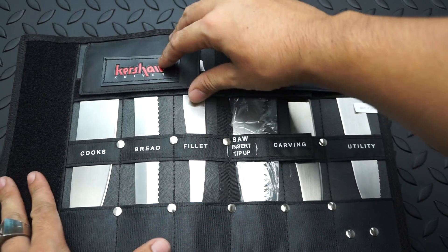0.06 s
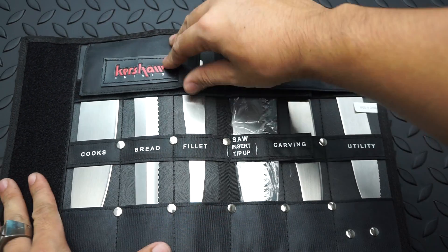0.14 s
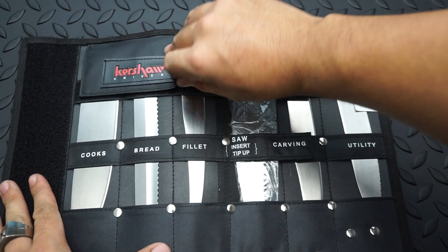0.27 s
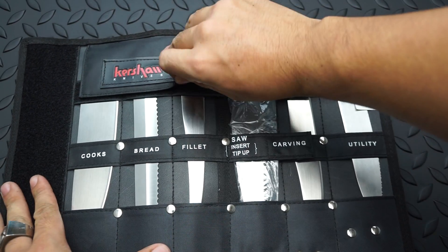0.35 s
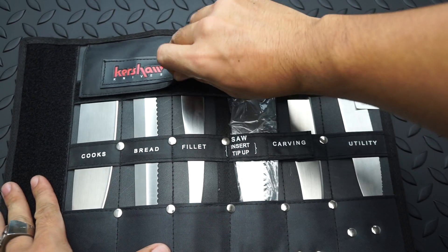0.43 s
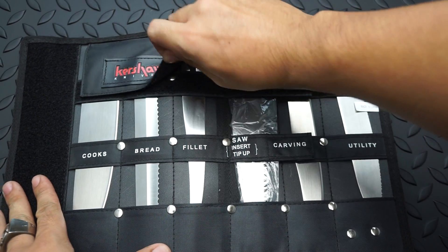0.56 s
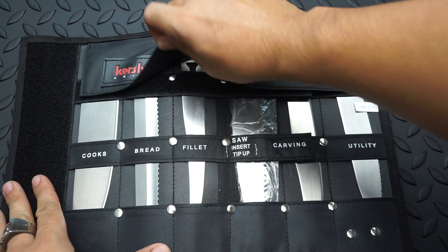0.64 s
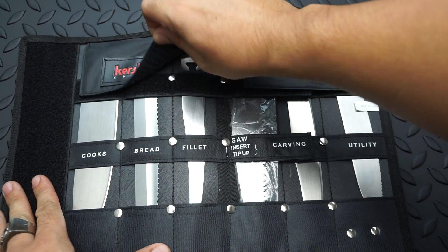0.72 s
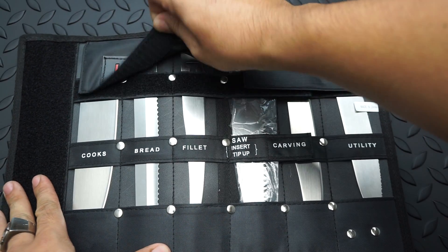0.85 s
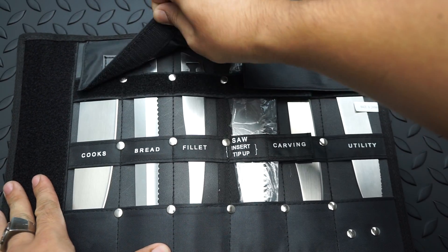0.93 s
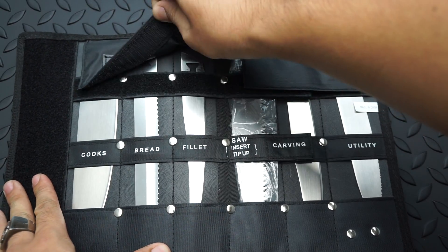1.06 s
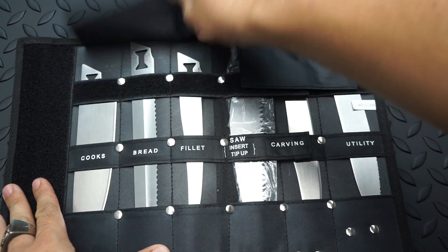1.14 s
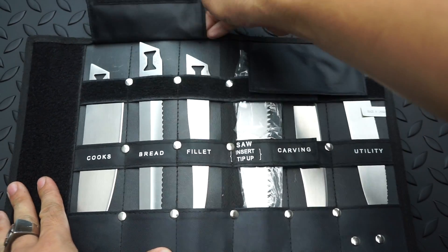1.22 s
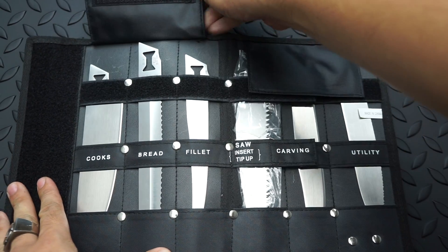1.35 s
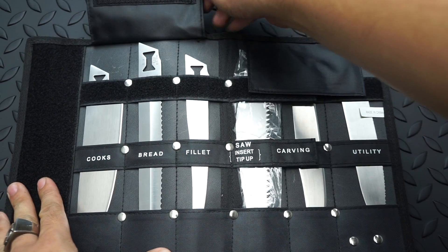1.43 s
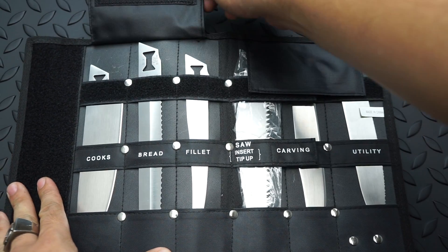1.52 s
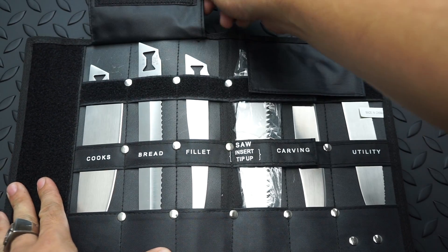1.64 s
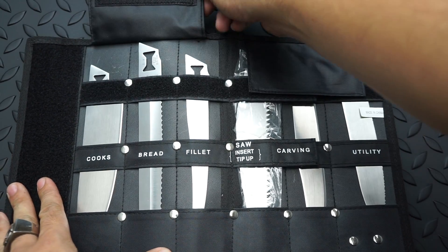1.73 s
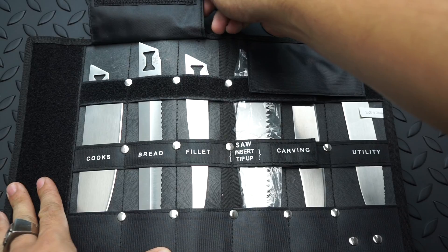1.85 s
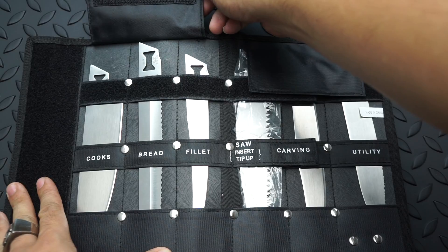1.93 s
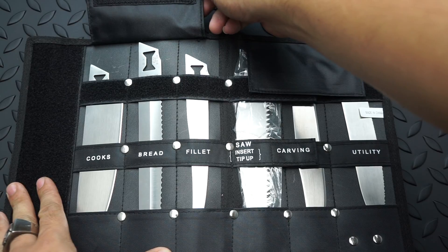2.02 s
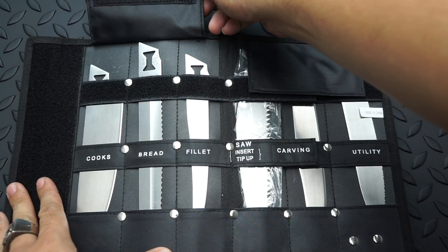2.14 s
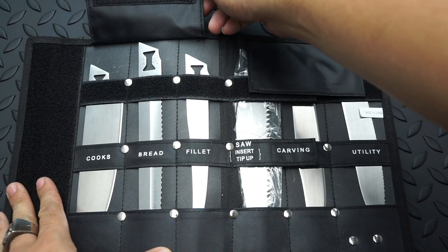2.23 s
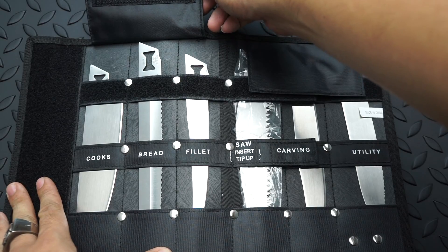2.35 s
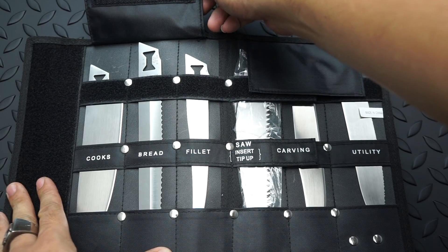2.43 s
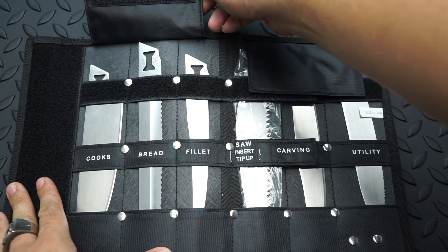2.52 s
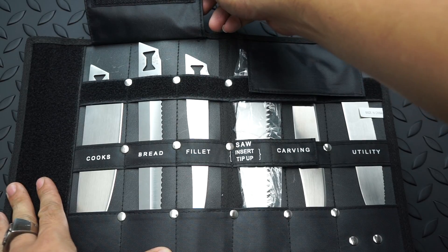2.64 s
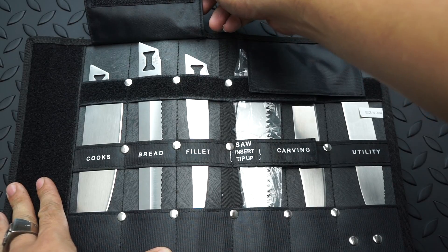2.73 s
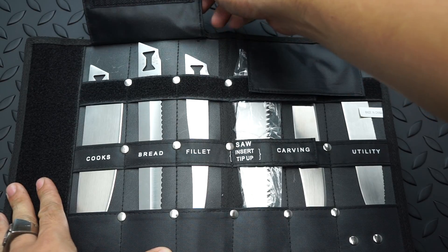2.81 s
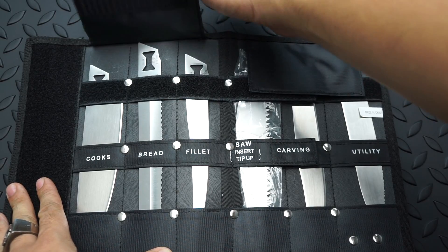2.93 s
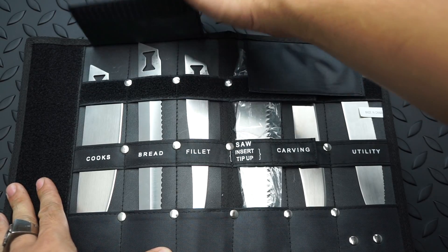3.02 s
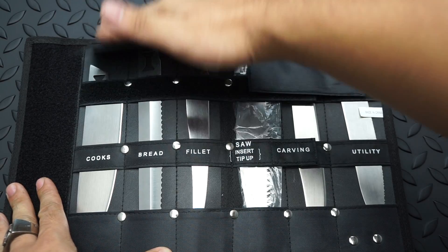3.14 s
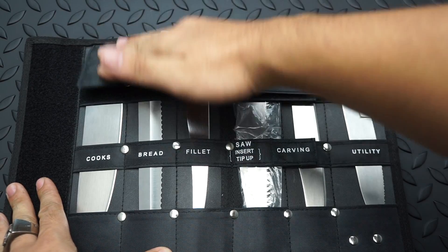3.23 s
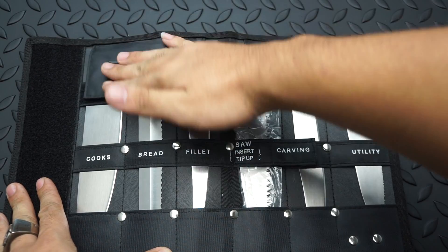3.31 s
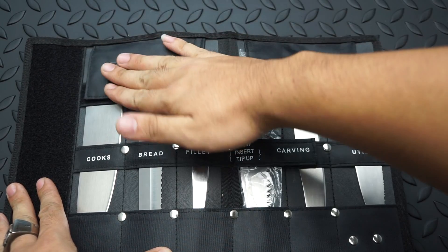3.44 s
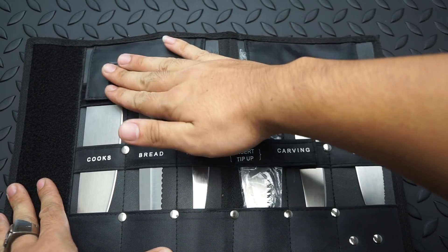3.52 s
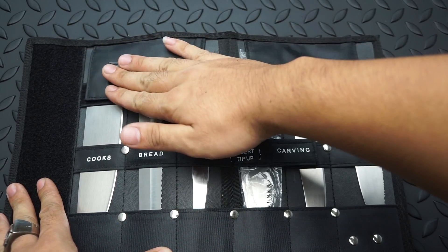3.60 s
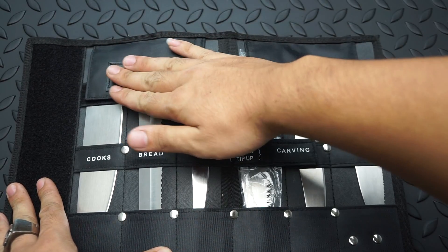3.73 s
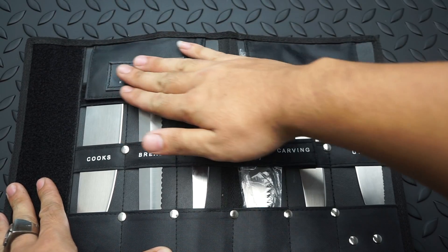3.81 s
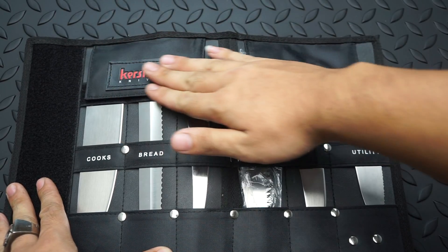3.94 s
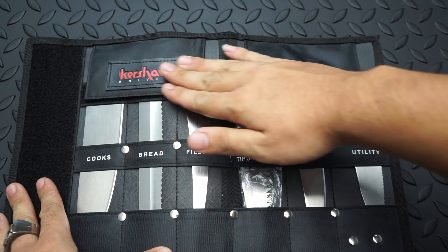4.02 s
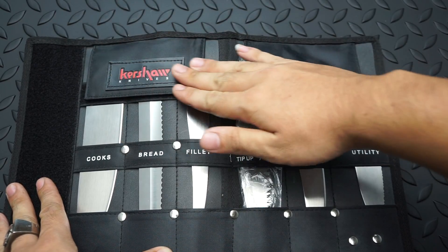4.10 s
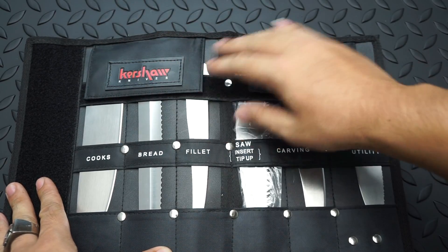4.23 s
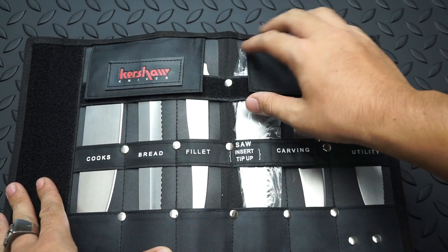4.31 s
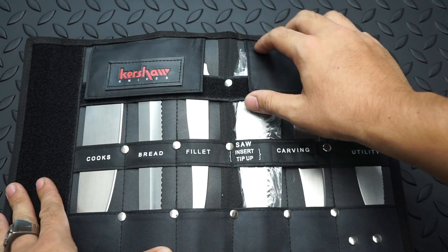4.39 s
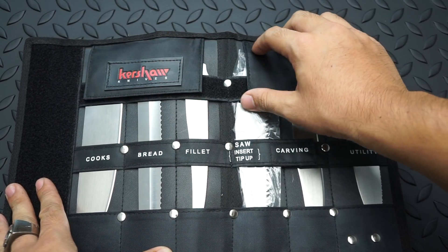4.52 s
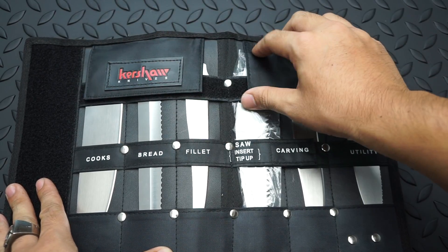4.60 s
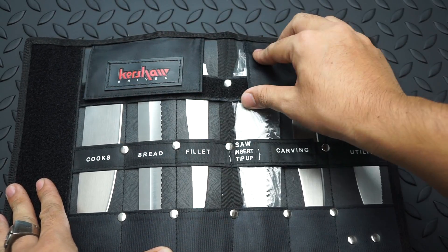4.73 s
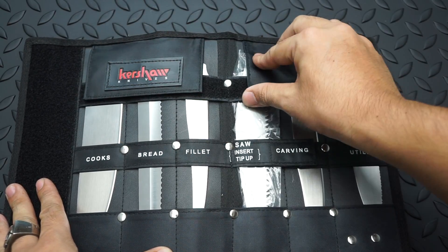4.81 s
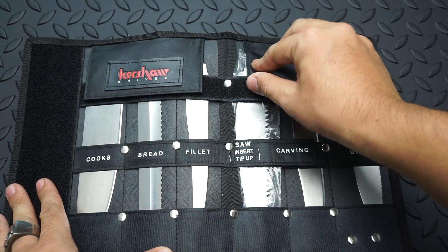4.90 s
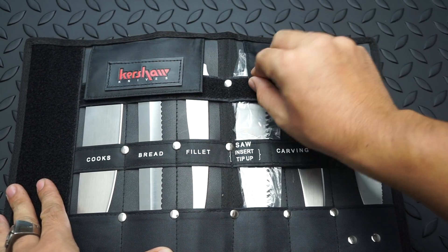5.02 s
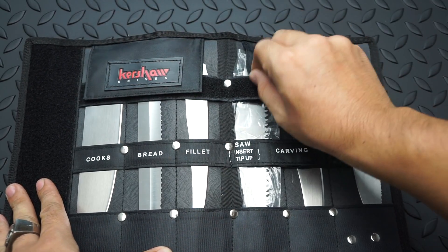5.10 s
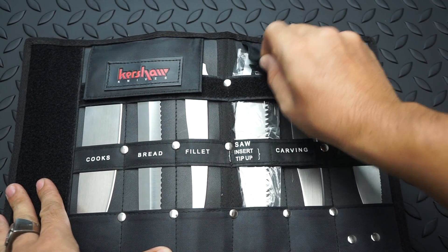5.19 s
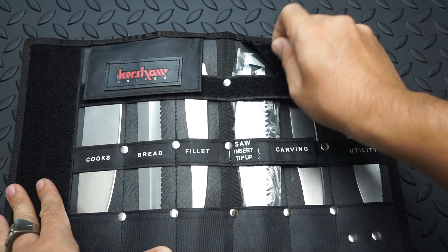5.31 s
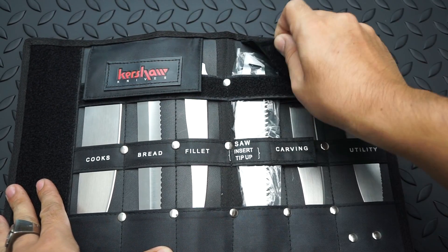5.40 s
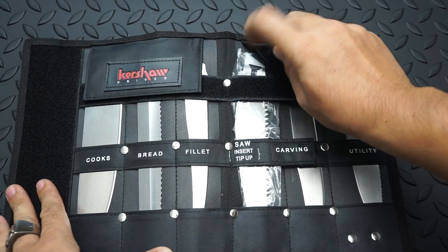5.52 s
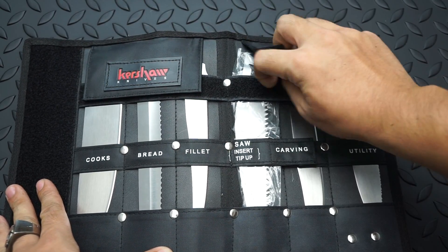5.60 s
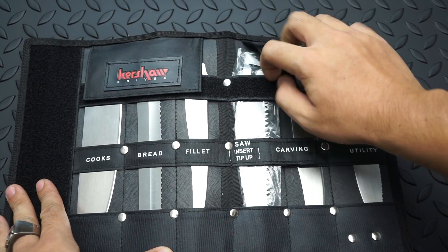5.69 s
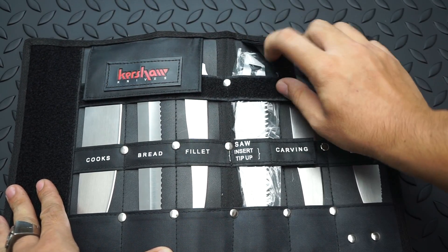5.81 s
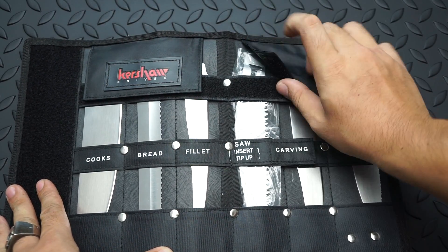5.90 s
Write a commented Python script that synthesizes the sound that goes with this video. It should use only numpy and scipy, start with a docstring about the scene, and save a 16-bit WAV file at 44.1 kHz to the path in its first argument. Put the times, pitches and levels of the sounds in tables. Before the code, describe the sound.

Close hook-and-loop flap tears open in jerky bright rasps, then dull bumps, soft cloth rubbing, and a second shorter sharp tear.

```python
"""A hand peels two hook-and-loop flaps of a nylon case open, close to a stereo microphone in a small hard room.
First the hand slides briefly over the cloth and the first flap tears: jerks and steady pulls snap hooks loose
and drum on the flap. A low push of the case follows, then dull bumps from further away and more sliding.
Single hooks tick before the second flap tears over another low push; short strokes, a tick and a faint jerk
end it. Shaped clicks make the hand, seam and bumps, rung modes the push, and quiet room noise lies below."""
import sys
import numpy as np
from scipy import signal
from scipy.io import wavfile
from scipy.ndimage import uniform_filter1d

SR = 44100
rng = np.random.default_rng(int(sys.argv[2]) if len(sys.argv) > 2 else 0)


def log_audio(samples):
    """Write samples as a 16-bit WAV file to the path given in sys.argv[1]."""
    # one column per channel
    frames = np.atleast_2d(samples).T
    # limit to full scale, then quantise
    limited = np.clip(frames, -1, 1)
    pcm = np.round(limited * 32767).astype(np.int16)
    wavfile.write(sys.argv[1], SR, pcm)


N = 262395  # length in samples


def amp(db):
    """Gain factor of a level in dB."""
    return 10 ** (np.asarray(db) / 20)


def evened(x):
    """Scale a sound to rms 1."""
    return x / np.sqrt(np.mean(x ** 2) + 1e-20)


def read(points, hz):
    """Read a table of (Hz, value) between its points, along log frequency."""
    point_hz, value = np.transpose(points)
    return np.interp(np.log(hz + 1), np.log(point_hz + 1), value)


def add(mix, start_s, sound):
    """Lay a sound into the mix from its start, cut off at the end of the mix."""
    part = mix[..., round(start_s * SR):][..., :np.shape(sound)[-1]]
    part += sound[..., :part.shape[-1]]


def colour(x, points):
    """Causal minimum-phase filter that leaves white noise at its level."""
    hz = abs(np.fft.fftfreq(4096, 1 / SR))
    log_gain = np.log(amp(np.maximum(read(points, hz), -100)))
    spectrum = np.exp(np.conj(signal.hilbert(log_gain)))
    taps = np.fft.ifft(spectrum).real[:2048]
    return signal.oaconvolve(x, taps / np.linalg.norm(taps))[:len(x)]


def grit(per_s, spread_db):
    """Separate clicks of uneven size and random sign, at random moments, rms 1."""
    size = amp(spread_db * np.minimum(rng.exponential(1, N), 4))
    size *= rng.choice([-1., 1.], N)
    return evened(size * (rng.random(N) < per_s / SR))


def swells(rows, axis, rise, fall):
    """Gain of events that rise, hold and fall smoothly; rise and fall are shares of each length."""
    out = np.zeros(N)
    for row in rows:
        start_s, length_s = row[:2]
        u = np.linspace(0, 1, max(round(length_s * SR), 2))
        shape = np.clip(np.minimum(u / rise, (1 - u) / fall), 0, 1)
        add(out, start_s, amp(row[axis]) * np.sin(shape * np.pi / 2) ** 2)
    return out


# Likeness of left and right in diffuse sound at the microphone.
# Each row: frequency in Hz, likeness from 0 to 1.
LIKENESS = [(30, 0.99), (290, 0.88), (640, 0.73), (1400, 0.58), (3000, .1)]


def diffuse(count, size, gain):
    """Two-channel noise from all around, most alike in the bass; gain(hz, t) shapes it."""
    hz = np.fft.rfftfreq(size, 1 / SR)[:, None]
    t = np.arange(4 * count // size + 5) * size / 4 / SR
    a, b, c, d = rng.standard_normal((len(t), len(hz), 4)).T
    same = np.clip(read(LIKENESS, hz), -1, 1)
    left = a + 1j * b
    right = same * left + np.sqrt(1 - same ** 2) * (c + 1j * d)
    spectra = np.array([left, right]) * gain(hz, t)
    return signal.istft(spectra, nperseg=size, noverlap=3 * size // 4)[1][:, :count]


# Spectrum of the room noise. Each row: frequency in Hz, relative density in dB.
AIR_COLOUR = [(15, -11), (28, 3), (55, -18), (100, -2), (146, -2), (347, -1.5), (472, -10), (1000, -12.5),
              (2080, -20), (13200, -29), (16000, -31)]
AIR_DB = -62  # rms before the wavering


def air():
    """Room noise as diffuse sound of uneven colour, its level wavering slowly."""
    noise = diffuse(count=N, size=2048, gain=lambda hz, t: amp(read(AIR_COLOUR, hz)))
    drift = uniform_filter1d(uniform_filter1d(rng.standard_normal(N), size=6000), size=6000)
    return amp(AIR_DB) * evened(noise) * amp(1.5 * evened(drift))  # wavers by 1.5 dB rms


# Strokes of hand and cloth, close to the microphone.
# Each row: start in seconds, length in seconds, relative level of the hiss in dB, of the body in dB.
STROKES = [(0, 0.23, -57.5, -48), (2.9, 1.47, -64.5, -66.5), (3.3, 0.8, -79, -62.5),
           (3.7, 0.97, -56.5, -55.5), (4.4, 0.43, -58.5, -57), (4.7, 0.66, -54, -54.5),
           (5.57, 0.11, -48, -52), (5.64, 0.1, -41.5, -46.5), (5.77, 0.11, -41, -45.5),
           (5.85, 0.078, -45, -49.5)]
# Colour of the hiss of the weave. Each row: frequency in Hz, gain in dB.
WEAVE_COLOUR = [(1500, -7), (2050, -7.5), (2500, -1.5), (3300, -6), (5400, -8), (10000, -11),
                (13000, -13.5), (16000, -22)]
# Dull colour of soft contact, shared by the rustle and the far bumps. Each row: frequency in Hz, gain in dB.
DULL_COLOUR = [(80, -28.5), (160, -5.5), (260, -18), (410, -2), (520, -8), (650, -5), (760, -9.5),
               (1000, -2.5), (1800, -10.5), (5000, -16)]


def slide():
    """Skin on woven nylon: dense fine clicks make a hiss, sparser dull ones a soft rustle."""
    # a stroke swells and fades without a hold
    hiss_gain, body_gain = (swells(STROKES, axis=k, rise=0.29, fall=0.71) for k in (2, 3))
    hiss = colour(grit(per_s=22000.0, spread_db=3.5) * hiss_gain, WEAVE_COLOUR)
    rustle_colour = DULL_COLOUR[:-2] + [(1800, -18)]  # duller on top than the bumps
    rustle = colour(grit(per_s=3300.0, spread_db=4.5) * body_gain, rustle_colour)
    return hiss + rustle


# Jerks of the seam, close to the microphone. Each row: start in seconds, relative level of the snaps in dB,
# of the drumming of the flap in dB, decay time in ms.
JERKS = [(0.082, -48, -42, 6.8), (0.1013, -35, -33, 2.5), (0.1227, -26.5, -58, 3), (0.137, -28.5, -47, 2.5),
         (0.1857, -19, -31, 5.6), (0.219, -16, -25, 8.8), (0.271, -13, -24.5, 6.4),
         (0.349, -19, -32.5, 6.3), (0.3687, -8, -18, 4.9), (0.408, -7, -18.5, 3.9),
         (0.4913, -13, -17.5, 7.6), (0.5095, -12, -23, 11), (0.5658, -4.5, -11, 2.3),
         (0.5825, -10.5, -37, 2.5), (0.6194, -12.5, -17.5, 6.5), (0.6266, -3.5, -18, 1.5),
         (0.702, -16, -8, 0.79), (0.7559, -12.5, -28, 4.4), (0.7673, -8.5, -17, 6.9),
         (0.8035, -13.5, -25, 5), (0.864, -10, -26.5, 7.5), (0.905, -13, -18, 2), (0.927, -12, -20.5, 6.6),
         (1.045, -9.5, -19, 1.3), (1.113, -18, -23, 11.5), (1.1376, -11.5, -18, 2.2),
         (1.1438, -5.5, -12, 2.7), (4.486, -39.5, -47, 3.5), (4.5287, -35.5, -55, 1.6),
         (4.9051, -26.5, -37, 2.1), (4.9122, -25, -36, 2.1), (5.006, -25.5, -36.5, 3.1),
         (5.0843, -29.5, -41, 3.4), (5.0955, -26.5, -36, 4.8), (5.1129, -2, -15, 0.6),
         (5.1172, -8.5, -23, 2.8), (5.13, -21, -37, 0.85), (5.1545, -2, -21, 2.2), (5.173, -15, -24, 4.1),
         (5.222, -10, -19, 1.7), (5.256, -14, -18, 2.6), (5.284, -7, -33, 0.91), (5.3109, -3, -11, 1.4),
         (5.327, -11.5, -14.5, 1.6), (5.347, -9, -18.5, 4.4), (5.3986, -24, -21, 4.8),
         (5.407, -6, -11, 0.89), (5.4106, -9.5, -10.5, 2.4), (5.814, -34, -53, 1.2)]
# Steady pulls that peel the seam between the jerks. Each row: start in seconds, length in seconds,
# relative level of the snaps in dB, of the drumming of the flap in dB.
PULLS = [(.41, 0.033, -19, -24), (.5, 0.075, -15.5, -18), (.625, 0.089, -16.5, -20), (.77, 0.091, -19, -27),
         (.87, 0.09, -19.5, -23.5), (1.142, 0.026, -16.5, -16), (5.12, 0.1, -19, -28),
         (5.195, 0.12, -19, -23)]
# Colours of the snaps, first and second tear. Each row: frequency in Hz, gain in dB.
SNAP_FIRST = [(300, -65.5), (1200, -33), (1750, -10.5), (2400, -4), (3200, -2.5), (5000, -1.07), (8000, -4),
              (11500, -7), (16000, -15)]
SNAP_SECOND = [(300, -67), (1200, -39.5), (1800, -10), (2400, -0.2), (3100, -2), (3800, -4.5), (4600, -2),
               (8000, -3.5), (11500, -6.5), (16000, -10.5)]
# Colours of the drumming flap, loose and then held taut. Each row: frequency in Hz, gain in dB.
FLAP_LOOSE = [(120, -41.5), (240, -25.5), (300, -16), (500, -9.5), (640, -2.5), (760, -5), (870, 2.5),
              (960, -5), (1250, -6), (1650, -14.5), (2500, -35)]
FLAP_TAUT = [(120, -33.5), (260, -19), (430, -4), (560, -4.5), (650, -4), (800, -5), (970, -1.5),
             (1230, -0.5), (1700, -8.5), (2600, -13), (4000, -37)]


def seam():
    """Hooks snap loose in large jerks and in many small ones; the same tugs drum on the flap."""
    hooks, knocks = grit(per_s=7000., spread_db=2.5), grit(per_s=2500., spread_db=0.0)
    t_ms = np.arange(1500) / SR * 1000
    clumps = abs(grit(per_s=400., spread_db=1.0))
    clumps = 0.4 + signal.oaconvolve(clumps, np.exp(-t_ms / 0.33))[:N]
    # a steady pull frees hooks at a steady pace
    clumps /= np.sqrt(uniform_filter1d(clumps ** 2, size=800))
    snap_gain, flap_gain = (swells(PULLS, axis=k, rise=0.039, fall=0.5) for k in (2, 3))
    snaps = hooks * clumps * snap_gain
    tugs = knocks * np.sqrt(clumps) * flap_gain
    for start_s, snap_db, flap_db, decay_ms in JERKS:
        burst, at = np.exp(-t_ms / max(decay_ms, .3)), round(start_s * SR)
        crack, knock = (burst * clicks[at:at + len(burst)] for clicks in (hooks, knocks))
        # the first hooks of a short jerk let go together
        crack[0] = np.linalg.norm(crack) / (1 + decay_ms / 4.3)
        strength = np.linalg.norm(burst)
        add(snaps, start_s, crack * amp(snap_db) * strength / np.linalg.norm(crack))
        add(tugs, start_s, knock * amp(flap_db) * strength / np.linalg.norm(knock))
    t = np.arange(N) / SR
    second = t > 5.1  # the second tear has its own colour
    taut = t > 1.13  # from the last jerks of the first tear on, the cloth is held taut
    drums = colour(tugs * ~taut, FLAP_LOOSE) + colour(tugs * taut, FLAP_TAUT)
    return colour(snaps * ~second, SNAP_FIRST) + colour(snaps * second, SNAP_SECOND) + drums


# Low push of the case on the table.
# Each row: start in seconds, length in seconds, level of the lower mode in dB, of the upper mode in dB.
PUSHES = [(1.2, 0.35, -68, -58), (5.05, 0.48, -53, -50.5), (5.4, 0.54, -71, -60)]
# Modes of table and room. Each row: frequency in Hz, width in Hz.
MODES = [(84, 24), (155, 33)]


def push():
    """Low modes, rung by noise, hum while the case is pressed and dragged."""
    t, out = np.arange(8000) / SR, np.zeros(N)
    for k, (hz, width_hz) in enumerate(MODES):
        ring = t * np.exp(-np.pi * width_hz * t) * np.sin(2 * np.pi * hz * t)
        hum = evened(signal.oaconvolve(rng.standard_normal(N), ring)[:N])
        out += hum * swells(PUSHES, axis=k + 2, rise=0.23, fall=0.54)
    return out


# Bumps further from the microphone.
# Each row: start in seconds, relative level in dB, rise in ms, upper band edge in Hz.
BUMPS = [(1.688, -54.5, 1.9, 3560), (2.0, -56.5, 32, 2940), (2.47, -55, 25, 4500), (2.489, -38.5, 40, 1080),
         (2.592, -46.5, 30, 1060), (2.72, -53.5, 53, 2800), (2.837, -27.5, 15.9, 1484),
         (2.901, -33, 12.3, 1190), (3.228, -51, 4, 1760), (3.253, -38.5, 3.2, 1110),
         (3.96, -40.5, 3.4, 880)]
FADE_MS, FADE_PER_RISE = 5.2, 1.44  # softer blows die slower
LOW_EDGE_HZ = 109.5  # for a blow that reaches 1 kHz; brighter blows are thinner


def bumps():
    """Soft, crumbly blows of clicks that rise and die away, dulled by distance."""
    out, t_ms = np.zeros(N), np.arange(13000) / SR * 1000
    crumbs = grit(per_s=4000., spread_db=1.5)
    for start_s, db, rise_ms, high_hz in BUMPS:
        fade_ms = FADE_MS + FADE_PER_RISE * rise_ms
        blow = np.minimum(t_ms / rise_ms, 1) * np.exp(-np.maximum(t_ms - rise_ms, 0) / fade_ms)
        blow *= crumbs[round(start_s * SR):][:len(blow)]
        low_hz = LOW_EDGE_HZ * (high_hz / 1000) ** 2
        band = signal.butter(2, [low_hz, high_hz], "band", fs=SR, output="sos")
        add(out, start_s, amp(db) * signal.sosfilt(band, blow))
    return colour(out, DULL_COLOUR)


# Single hooks that let go with a bright tick, close to the microphone.
# Each row: start in seconds, relative level in dB, pitch in Hz.
TICKS = [(3.6530, -17, 5800), (4.854, -21.5, 7400), (4.946, -15, 8500), (5.7553, -17.5, 5760)]
TICK_WIDTH = 0.28  # share of the pitch to either side


def ticks():
    """Each tick is one sharp click and a weaker fizz, in one bright band."""
    out, t_ms = np.zeros(N), np.arange(900) / SR * 1000
    for start_s, db, hz in TICKS:
        edges = [hz * (1 - TICK_WIDTH), hz * (1 + TICK_WIDTH)]
        band = signal.butter(1, edges, "band", fs=SR, output="sos")
        fizz = 0.13 * rng.standard_normal(len(t_ms)) * np.exp(-t_ms / 3.5)
        click = fizz + (t_ms == 0)
        add(out, start_s, amp(db) * signal.sosfilt(band, click))
    return out


# Reverberation of the small hard room. Each row: frequency in Hz, time to die by 60 dB in seconds.
DECAY = [(150, 0.89), (400, 0.62), (1040, 0.49), (2760, 0.49), (7280, 0.35), (11000, 0.32), (15000, .3)]


def room(x, gap_ms):
    """Dense reflections that build up over a gap, each band dying at its own speed."""
    tail = diffuse(count=SR * 2 // 3, size=512, gain=lambda hz, t: amp(-60 * t / read(DECAY, hz)))
    tail *= np.clip(np.arange(tail.shape[1]) / SR * 1000 / gap_ms, 0, 1)
    return signal.fftconvolve(x[None], tail / np.linalg.norm(tail[0]), axes=1)[:, :N]


def table(x):
    """Direct sound, up to 3 samples apart at the two ports, and first bounces off table and hand."""
    taps = np.zeros((2, 500))
    taps[[0, 1], [0, rng.integers(0, 4)]] = 1
    for ms in np.geomspace(.4, 6.5, num=10):
        at = ms * rng.uniform(0.58, 1.2) * SR / 1000 + rng.integers(0, 9, 2)
        taps[[0, 1], at.astype(int)] += amp(-10.0 - 0.18 * ms) * rng.choice([-1, 1])
    taps /= np.linalg.norm(taps, axis=1, keepdims=True)
    return signal.oaconvolve(x[None], taps, axes=1)[:, :N]


def wander(x, count, turns_per_s):
    """The tearing point moves: near sound fades round a ring of different paths to the ports."""
    turn = np.arange(N) / SR * turns_per_s
    out = np.zeros((2, N))
    for k in range(count):
        offset = (turn - k / count + .5) % 1 - .5
        share = np.cos(np.clip(offset * count, -1, 1) * np.pi / 2)
        out += amp(-7.0) * (table(x * share) + room(x * share, gap_ms=2.1))
    return out * amp([[.5], [-.5]])  # the left is 1 dB stronger


def scene():
    """Near sounds on wandering paths, far bumps with their room, the push and the room noise."""
    near = wander(slide() + seam() + ticks(), count=6, turns_per_s=5.0)
    far = bumps()
    return near + amp(-1.5) * far + room(far, gap_ms=1.8) + push() + air()


EDGE_HZ = 15850  # upper band limit


def record(dry):
    """The loudest snaps are rounded off; then the band limit."""
    dry = .7 * np.tanh(dry / .7)
    lowpass = signal.firwin(511, EDGE_HZ, window=("kaiser", 9), fs=SR)
    return signal.oaconvolve(dry, lowpass[None], "same")


dry = scene()
out = record(dry)
log_audio(out)
```